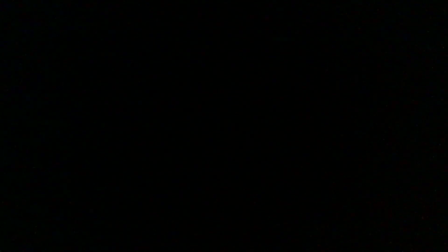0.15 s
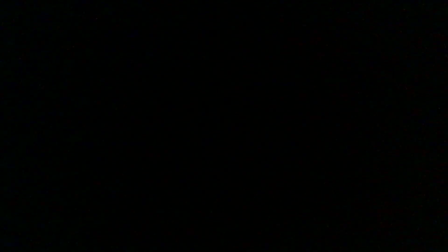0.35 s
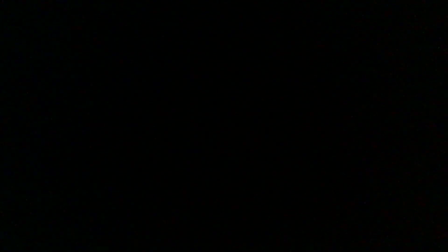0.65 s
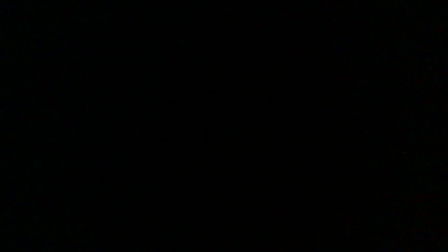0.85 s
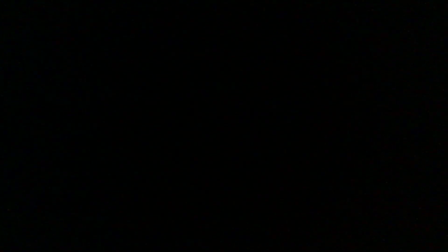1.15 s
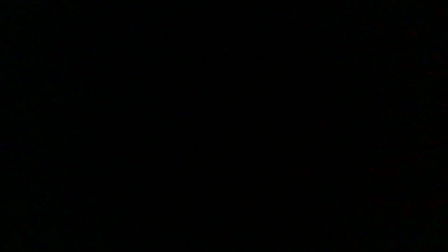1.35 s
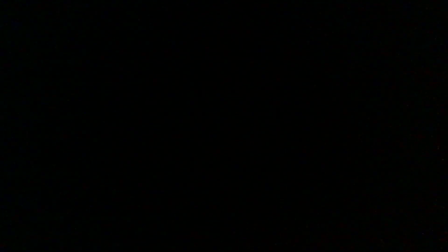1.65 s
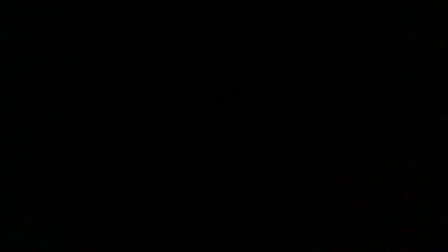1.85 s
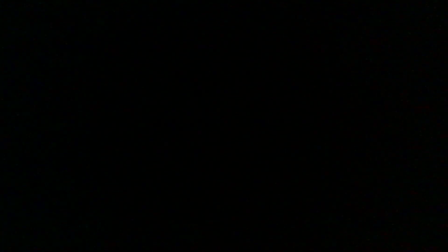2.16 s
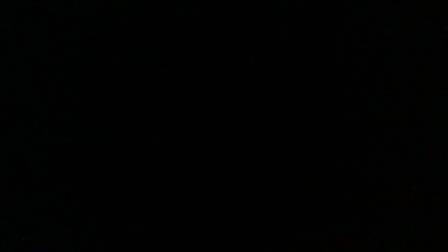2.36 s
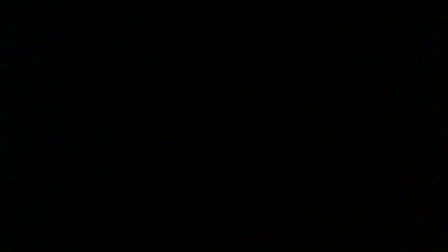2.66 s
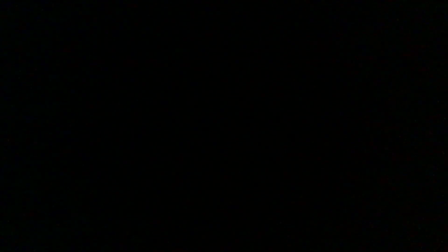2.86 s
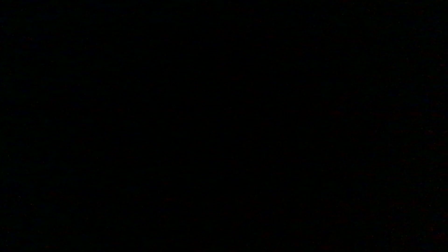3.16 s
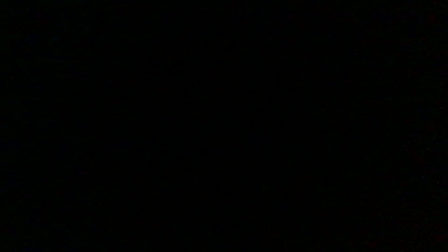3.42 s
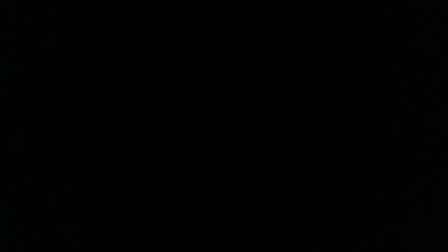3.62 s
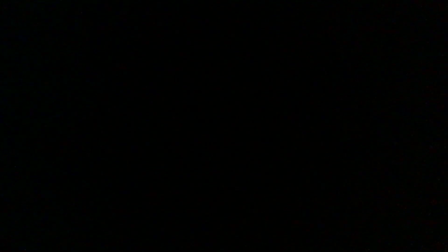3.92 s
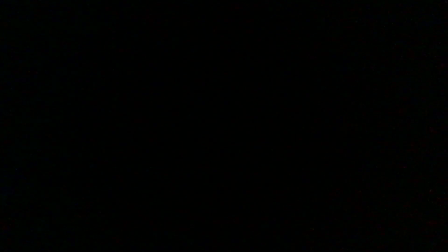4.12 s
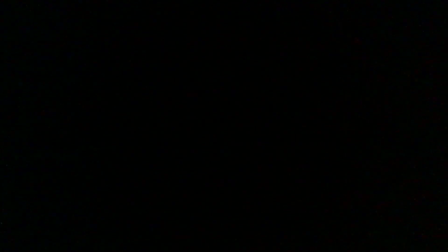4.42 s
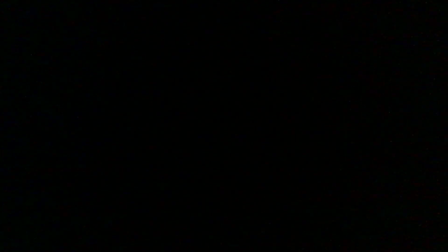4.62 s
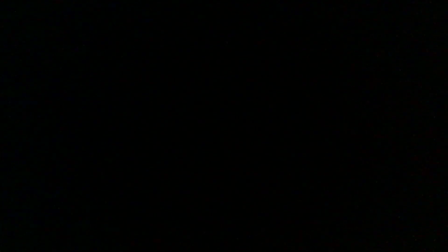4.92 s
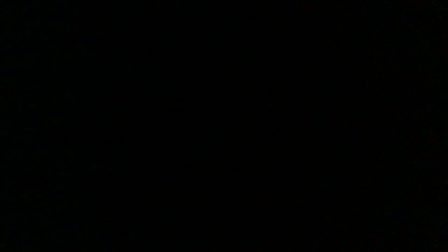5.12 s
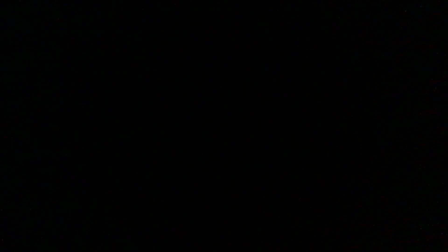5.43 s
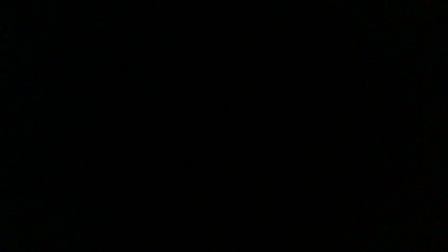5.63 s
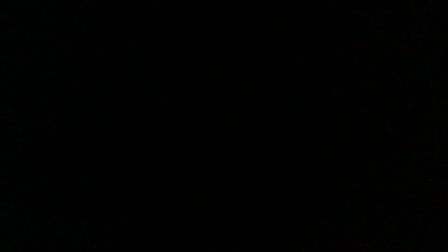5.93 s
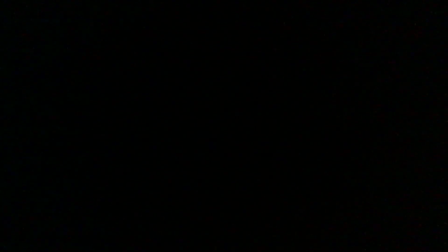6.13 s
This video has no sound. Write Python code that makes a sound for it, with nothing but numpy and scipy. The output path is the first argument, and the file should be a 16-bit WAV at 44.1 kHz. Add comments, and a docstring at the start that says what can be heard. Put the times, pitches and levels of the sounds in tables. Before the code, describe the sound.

A small laptop fan whirs and hums steadily while hands knock, bump and rub on the case close to the microphone.

```python
"""Handling a whirring laptop

A small cooling fan whirs and hums close to the built-in microphone. Hands rub over the case in
short strokes, bump it and knock on it. The shell is a thin plate: its bending waves carry
treble faster than bass, so each knock arrives as a quick falling chirp."""
import sys
import numpy as np
from scipy import signal
from scipy.fft import rfft, irfft, next_fast_len
from scipy.io import wavfile

SR = 44100
rng = np.random.default_rng(int(sys.argv[2]) if len(sys.argv) > 2 else 0)


def wav_record(signal):
    """Record a signal, one row per channel, as 16-bit PCM in the file named by sys.argv[1]."""
    frames = np.transpose(np.atleast_2d(signal))
    bounded = np.clip(frames, -1, 1)
    # unit amplitude maps onto the largest positive 16-bit level
    quanta = np.round(bounded * 32767).astype(np.int16)
    wavfile.write(sys.argv[1], SR, quanta)


N = 276948
FFT_SIZE = next_fast_len(N + SR // 4, True)
FFT_HZ = np.fft.rfftfreq(FFT_SIZE, 1 / SR)

# recorder gain as a drawn curve: the fan dips after loud knocks and rubs, then slowly recovers
# time_s, whir_db, air_db
FAN_LEVELS = [(0, -46.5, -49.5), (.33, -43.5, -49.5), (1.12, -41, -46.5), (1.45, -46.5, -49),
              (2.2, -50.5, -52.5), (3, -49.5, -53.5), (3.4, -51, -49.5), (4, -46.5, -48.5),
              (4.9, -46.5, -44.5), (5.4, -41.5, -43.5), (6.05, -40, -43.5)]
# fan noise colours: frequency_hz, density_db
WHIR_EQ = [(21, -35), (35, -40), (64, 1), (96, -4), (114, 3), (171, 4), (222, -0.5), (312, -3.5), (351, -8),
           (444, -8), (569, -27), (624, -35), (800, -76), (1040, -53), (1760, -120)]
AIR_EQ = [(350, 3.5), (600, 5.5), (669, 2), (800, 0.5), (917, -4), (1020, -1.5), (1350, 0.5), (1740, -6),
          (2360, -9.5), (4020, -16.5), (4610, -20.5), (5430, -24), (7140, -28.5), (9390, -25.5),
          (15800, -35)]
# fan duct resonances: centre_hz, width_hz, gain_db
DUCT_MODES = [(500, 70, 5.5), (1310, 160, 1.5), (2390, 320, 2.5), (3470, 300, -0.5), (4720, 300, 6),
              (8700, 2700, 2)]
# motor tones, set against the air rush: pitch_hz, relative_db
MOTOR_TONES = [(161.5, -20), (323, -14), (457.6, -8), (1044, -18), (1249, -36), (1626, -44), (4479, -29)]
# hard knocks: start_s, thud_db, clack_db, tick_db, travel_ms, thud_hz, clack_pitch_ratio
KNOCKS = [ (.133, -29.5, -33.5, -39.5, 2, 171, 0.73), (0.4, -14.5, -23, -74, 1.9, 113, 0.53),
          (.449, -27, -32, -44, 2.2, 206, 1), (1.1451, -7, -3, -13.5, 1.55, 86, 1.02),
          (1.1928, -14, -7, -49, 1.5, 156, 0.81), (1.254, -16, -7.5, -7.5, 1.5, 131, 1.28),
          (1.9905, -13.5, -6.5, -9.5, 2, 91, 1.27), (5.6314, -16.5, -8.5, -34, 3, 181, 1.31),
          (6.204, -13, -18.5, -29, 2.4, 102, 1.37)]
# a thud's low boom: pitch_ratio, density_db
THUD_EQ = [(.25, -43), (.55, -9.5), (.8, -2.5), (1, 12.5), (1.3, 0), (2.2, -6.5), (4, -21), (8, -53)]
# midrange clack and bright tick: frequency_hz, density_db
CLACK_EQ = [(130, 16), (300, 0), (550, 9.5), (1000, 6), (1800, -3), (2800, -13), (4500, -28), (9000, -60)]
TICK_EQ = [(900, -34), (2200, 11.5), (4000, 6.5), (6500, -1.5), (9000, 3.5), (15800, -27.5)]
# case resonances: centre_hz, width_hz, gain_db
NEAR_MODES = [(507, 320, 9), (690, 130, 3.5), (744, 35, 0), (1040, 35, 4.5), (1140, 250, 1.5),
              (1400, 190, 0.5), (2100, 350, 4.5), (2460, 180, 8), (3170, 250, 5.5), (3920, 190, 7)]  # by the microphone
FAR_MODES = [(284, 78, 1.5), (420, 44, 7.5), (760, 82, -5), (1160, 65, 3), (1450, 40, -3.5),
             (1696, 54, 3.5), (2086, 170, 7), (2460, 38, 6.5), (3070, 105, 2), (3225, 75, 8),
             (4300, 140, 8.5), (5500, 210, 7), (9040, 990, -4.5), (13000, 5600, 1.5)]
RIM_MODES = [(684, 76, 10.5), (947, 110, 8.5), (1506, 100, 10.5)]  # also rung by a blow at the far end
# where the hand is, from 0 near to 1 far: time_s, position
HAND_PATH = [(2.65, 0.023), (3.1, 1)]
# fingernail ticks: start_s, level_db
NAIL_TICKS = [(.283, -49), (1.447, -31), (3.711, -49), (5.754, -26), (5.969, -28), (6.235, -31)]
# palm bumps: start_s, level_db, thud_hz
PALM_BUMPS = [(.409, -18, 114), (1.998, -6.5, 188), (4.282, -24, 169), (4.641, -26, 92),
              (5.436, -23.5, 165), (5.471, -25.5, 159), (5.752, -16, 253), (5.878, -21.5, 270),
              (6.213, -16.5, 256)]
# rubbing strokes: start_s, rise_s, hold_s, fade_s, level_db, heavy_db, bright_db
STROKES = [ (1.185, 0.048, 0.11, 0.19, -16.5, -4.5, 2), (1.645, 0.088, 0.012, 0.88, -33.5, 1.5, 1),
           (1.854, .02, 0.12, 0.015, -21, -2.5, -2), (2.379, 0.041, 0.028, 0.13, -39, 0.5, -4),
           (2.435, 0.12, .13, 0.067, -18.5, -9.5, 2.5), (2.679, 0.027, 0.076, 0.17, -33.5, 2, 7),
           (3.064, 0.1, 0.034, 0.41, -31.5, -4, -1), (3.401, 0.095, 0.042, 0.14, -37.5, 1.5, -5.5),
           (3.757, 0.07, 0.038, 0.096, -27, -4, 0), (4.071, 0.063, 0.037, 0.15, -25.5, -4.5, 2.5),
           (4.3, 0.15, 0.075, 0.12, -25.5, -4.5, -1.5), (4.638, 0.11, 0.061, 0.12, -29, 1, -0.5),
           (5.403, 0.024, 0.044, 0.37, -41, 7.5, 1), (5.522, 0.095, 0.05, .04, -35.5, -4, -4),
           (5.713, 0.033, 0.0079, 0.082, -32, -1, 2.5), (5.83, 0.075, .025, 0.084, -38, 11, 1),
           (5.889, 0.062, 0.021, 0.029, -24.5, -13, -0.5), (6.224, 0.076, .03, .1, -33.5, 8, -3)]
# rubbing colours, dark to bright: frequency_hz, density_db
DRAG_EQ = [(35, -60), (60, -9), (95, -3), (170, 2), (280, 0), (380, -9), (520, -17)]
SCRAPE_EQ = [(200, -5), (340, -4.5), (520, -0.5), (700, -2), (900, -7), (1150, -26.5), (1500, -38)]
RASP_EQ = [(650, -3), (950, 0), (1200, 2), (1500, -4), (2200, -9), (2800, -16), (4200, -23), (5200, -37.5),
           (7500, -50), (12000, -62)]
HISS_EQ = [(2500, -10.5), (4500, -4.5), (6500, -3), (7800, -6.5), (8300, 2.5), (9500, 0.5), (11500, -5),
           (14000, -9.5), (15800, -13)]
# skin catching in the hardest strokes: start_s, level_db
SKIN_CATCHES = [(1.329, -5), (2.53, -6), (2.572, -14), (2.611, -8), (2.647, -15)]
# the case's brief hum: start_s, rise_s, hold_s, fade_s
HUM_SWELL = (4.93, 0.23, 0.11, 0.24)


def amp(db):
    """Decibels to gain."""
    return 10 ** (np.asarray(db) / 20)


def unit(x):
    """Scale to rms 1."""
    return x / np.sqrt(np.mean(x ** 2) + 1e-20)


def colour(eq, hz):
    """Gain of an EQ curve on a log axis, rolling off steeply past its ends."""
    points_hz, db = np.transpose(eq)
    inside = np.minimum(hz / points_hz[0], points_hz[-1] / (hz + 1))
    return amp(np.interp(np.log(hz + 1), np.log(points_hz), db)) * np.minimum(1, inside) ** 2


def resonances(modes, hz):
    """Response of a few peaks and dips, each ringing briefly."""
    gain = 1
    for centre, width, db in modes:
        spring, loss, half = centre ** 2 - hz ** 2, 1j * hz * width, amp(db / 2)
        gain = gain * (spring + loss * half) / (spring + loss / half)
    return gain


def curves(rows):
    """One automation curve for each column after the time."""
    times, *columns = np.transpose(rows)
    return [np.interp(np.arange(N) / SR, times, column) for column in columns]


def wobble(rate):
    """A smooth random curve, rate knots a second."""
    step = max(int(SR / rate), 1)
    knots = rng.standard_normal(N // step + 4)
    return signal.upfirdn(np.hanning(2 * step + 1), knots, step)[step:][:N]


def swell(start, rise, hold, fade):
    """A gesture that rises to 1, holds, then drops 30 dB per fade time."""
    t = np.arange(N) / SR - start
    attack = np.sin(np.pi / 2 * np.clip(t / rise, 0, 1))
    return attack * amp(-30 * np.clip((t - rise - hold) / fade, 0, 10))


def filtered(x, response):
    """Filter x by a response given on FFT_HZ."""
    return irfft(rfft(x, FFT_SIZE) * response, FFT_SIZE)[:N]


def causal(gain):
    """The response with this gain that sounds only after the hit."""
    cepstrum = irfft(np.log(gain + 1e-6))
    half = len(cepstrum) // 2 - 1
    return np.exp(rfft(cepstrum * np.r_[1, np.full(half, 2), 1, np.zeros(half)]))


def tone(hz, drift):
    """A sine at rms 1 with a wavering pitch."""
    pitch_hz = hz * (1 + drift * wobble(12))
    return np.sqrt(2) * np.sin(2 * np.pi * np.cumsum(pitch_hz) / SR)


def airflow(eq):
    """Turbulent air, coloured by the fan duct."""
    return unit(filtered(rng.standard_normal(N), colour(eq, FFT_HZ) * resonances(DUCT_MODES, FFT_HZ)))


def fan(whir_trim_db=-.5, air_trim_db=-1):
    """The bed: low whir and air rush through the duct, with slightly unsteady motor tones."""
    whir_db, air_db = curves(FAN_LEVELS)
    air_db += air_trim_db
    eddies_db = .7 * wobble(17)
    whir = amp(whir_db + whir_trim_db + 0.78 * wobble(22)) * airflow(WHIR_EQ)
    air = amp(air_db + eddies_db) * airflow(AIR_EQ)
    motor = sum(amp(air_db + db + 1.8 * wobble(9.1)) * tone(hz, drift=0.00573) for hz, db in MOTOR_TONES)
    return whir + air + motor


def bending(hz, travel_ms):
    """A bending wave's phase: bass arrives last; travel_ms is the delay near 1 kHz."""
    delay_s = travel_ms * .001 * (1000 / (hz + 25)) ** .92
    return np.exp(-2j * np.pi * np.cumsum(delay_s) * hz[1])


def blow(start_s, parts, travel_ms, low_cut_hz=200, high_cut_hz=3200, damped_s=.1):
    """One hit, layered from (eq, peak_db) parts, chirps through the shell and echoes off its edges."""
    size = 2 ** 13
    hz = np.fft.rfftfreq(size, 1 / SR)
    fade = amp(-60 * (np.arange(size) / SR / damped_s) ** 2)  # each hit dies away quickly, its low ringing included
    edge_echo = amp(-7) * bending(hz, travel_ms * 2.4)
    corner_echo = -amp(-14) * bending(hz, travel_ms * 4.1)
    # bass and treble die on the longer paths
    echo_band = hz ** 2 / (hz ** 2 + low_cut_hz ** 2) / (1 + (hz / high_cut_hz) ** 2)
    path = bending(hz, travel_ms) + echo_band * (edge_echo + corner_echo)
    is_far = np.interp(start_s, *np.transpose(HAND_PATH)) > .5
    shell = resonances(FAR_MODES + RIM_MODES if is_far else NEAR_MODES, hz)
    out = np.zeros(N + size)
    for eq, db in parts:
        wave = fade * irfft(causal(colour(eq, hz)) * path * shell)
        out[round(start_s * SR):][:size] += amp(db) * wave / np.abs(wave).max()
    return out[:N]


def tuned(eq, factor):
    """Slide an EQ curve in pitch."""
    return np.array(eq) * [factor, 1]


def knocks():
    """A hard knock on the case is a thud, a clack and a tick at once."""
    out = np.zeros(N)
    for start_s, thud_db, clack_db, tick_db, travel_ms, thud_hz, clack_ratio in KNOCKS:
        thud, clack = tuned(THUD_EQ, thud_hz), tuned(CLACK_EQ, clack_ratio)
        out += blow(start_s, [(thud, thud_db), (clack, clack_db), (TICK_EQ, tick_db)], travel_ms)
    return out


def nail_ticks():
    """A light fingernail only ticks."""
    return sum(blow(s, [(TICK_EQ, db)], travel_ms=1.083) for s, db in NAIL_TICKS)


def palm_bumps():
    """A soft palm only thuds."""
    return sum(blow(s, [(tuned(THUD_EQ, hz), db)], travel_ms=2) for s, db, hz in PALM_BUMPS)


def slips(eq, shells, spread_db, ring_db=-11, ring_t60_s=0.032):
    """Countless tiny slips of uneven size; the shell colours them by where the hand is."""
    grains = rng.standard_normal(N) * amp(spread_db * wobble(700))
    # the shell's many small treble modes keep each slip ringing a little
    t = np.arange(SR // 10) / SR
    tail = np.diff(rng.standard_normal(len(t)) * amp(-60 * t / ring_t60_s))
    ringing = 1 + amp(ring_db) * rfft(tail / np.linalg.norm(tail), FFT_SIZE)
    spectrum = rfft(grains, FFT_SIZE) * ringing * colour(eq, FFT_HZ)
    near, far = irfft(spectrum * shells, FFT_SIZE)[:, :N]
    position = np.clip(curves(HAND_PATH)[0], 0, 1)
    return (1 - position) * unit(near) + position * unit(far)


def rubbing():
    """Skin drags on the case: light strokes glide, hard ones stick and let go; faster is brighter."""
    drag, scrape, rasp, hiss = np.zeros((4, N))
    for start, rise, hold, fade, db, heavy_db, bright_db in STROKES:
        speed = swell(start, rise, hold, fade)
        drag += amp(db + heavy_db) * speed
        scrape += amp(db) * speed ** 1.67
        rasp += amp(db + bright_db) * speed ** 1.87
        hiss += amp(db + bright_db) * speed ** 1.9
    shells = np.array([resonances(NEAR_MODES, FFT_HZ), resonances(FAR_MODES, FFT_HZ)])
    shells *= bending(FFT_HZ, travel_ms=1.783)
    pressure = np.sqrt(scrape / scrape.max())
    grip = pressure * wobble(75)  # one judder shared by the upper three layers
    rumble = drag * amp(-2) * slips(DRAG_EQ, shells, spread_db=1.5)
    body = scrape * amp(1.9 * grip - 1.5) * slips(SCRAPE_EQ, shells, spread_db=4)
    grit = rasp * amp(3.2 * grip - 7.5) * slips(RASP_EQ, shells, spread_db=1)
    fizz = hiss * amp(3 * grip - 24) * slips(HISS_EQ, shells, spread_db=1)
    return rumble + body + grit + fizz


def skin_catches():
    """Skin catches and lets go, jerking the case."""
    return sum(blow(s, [(SCRAPE_EQ, db)], travel_ms=1.5) for s, db in SKIN_CATCHES)


def case_hum(pitch_hz=118, level_db=-37.5):
    """The case hums for a moment on one low, wavering note."""
    return swell(*HUM_SWELL) * amp(level_db + 0.95 * wobble(27)) * tone(pitch_hz, drift=0.0072)


def scene(hits_trim_db=-2):
    """Mono mix: rubbing and hits over the fan bed."""
    bed = fan() + case_hum()
    hits = knocks() + nail_ticks() + palm_bumps() + skin_catches()
    return (bed + rubbing() + amp(hits_trim_db) * hits)[None]


def record(dry, ceiling=.7, top_hz=15850):
    """The microphone rounds off the highest peaks and keeps nothing above its band limit."""
    rounded = dry[0] / (1 + np.abs(dry[0] / ceiling) ** 6) ** (1 / 6)
    return filtered(rounded, FFT_HZ < top_hz)[None]


dry = scene()
out = record(dry)
wav_record(out)
```